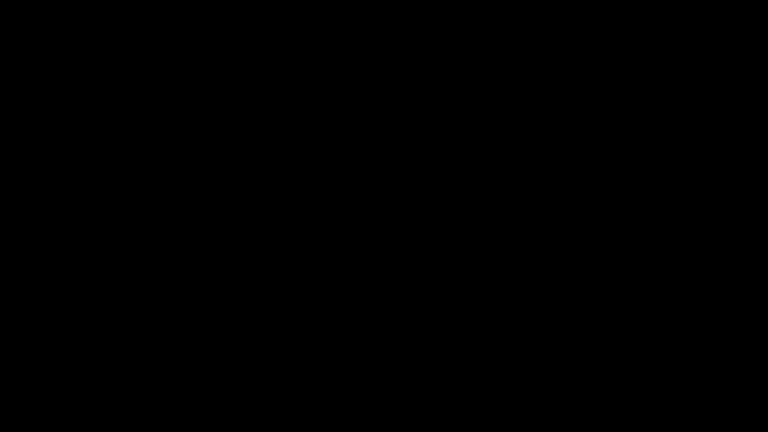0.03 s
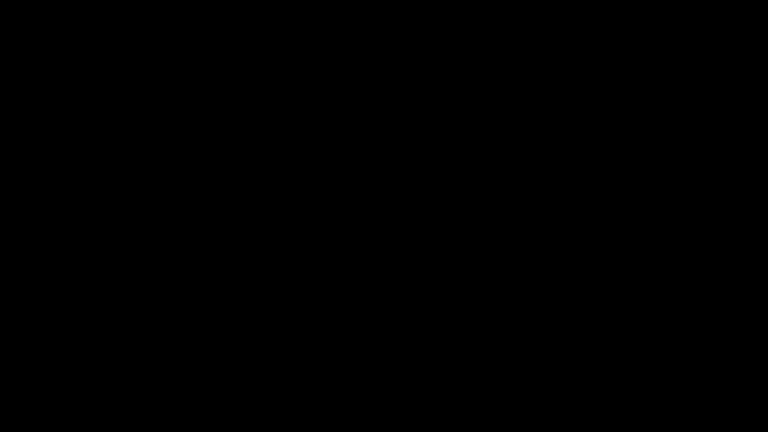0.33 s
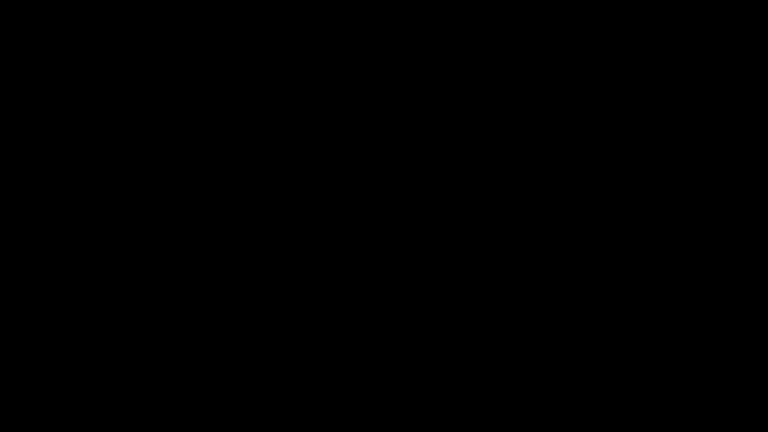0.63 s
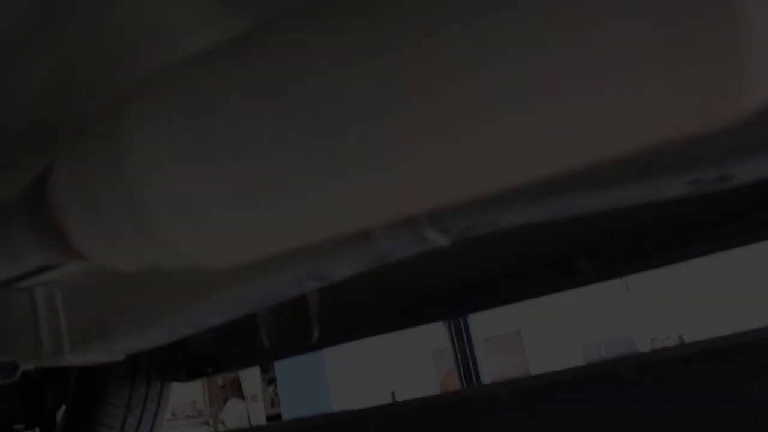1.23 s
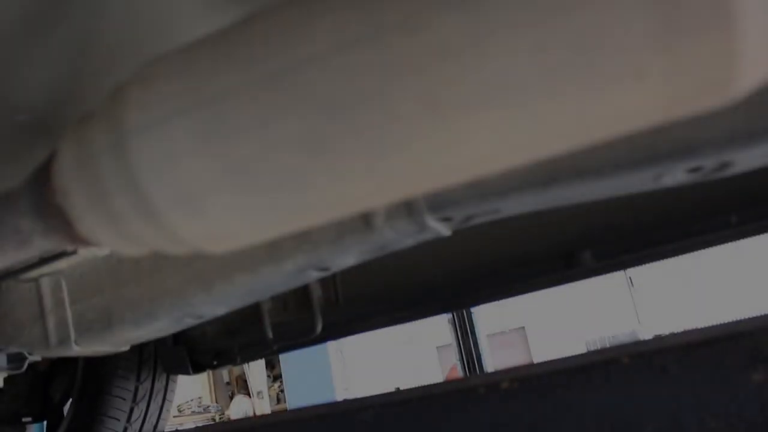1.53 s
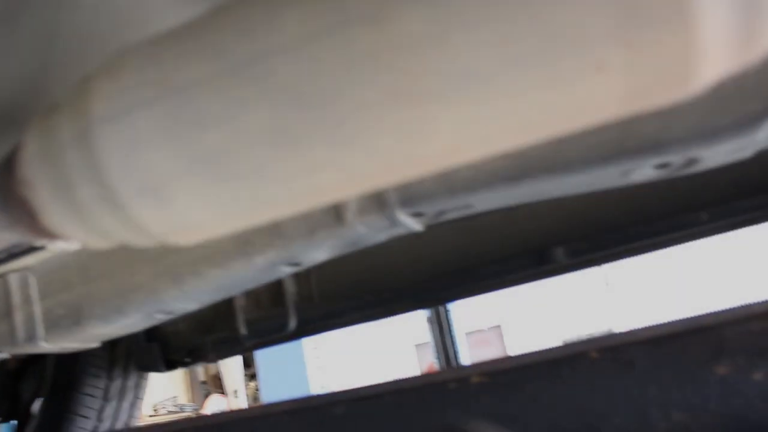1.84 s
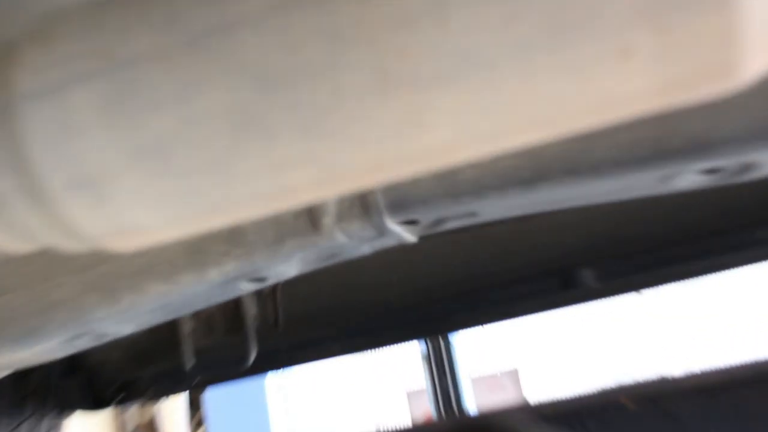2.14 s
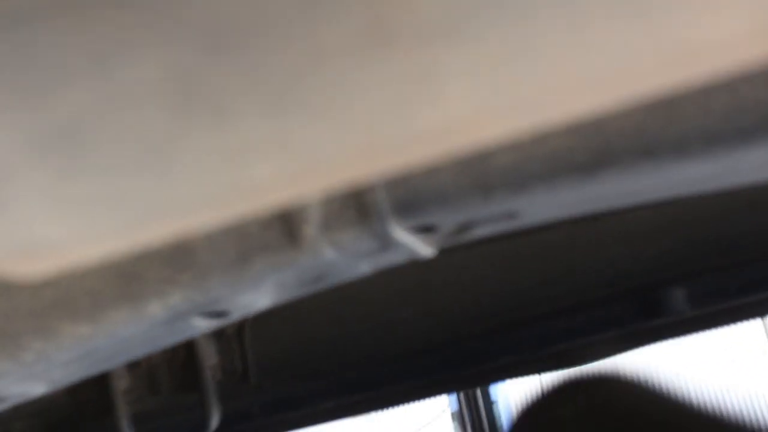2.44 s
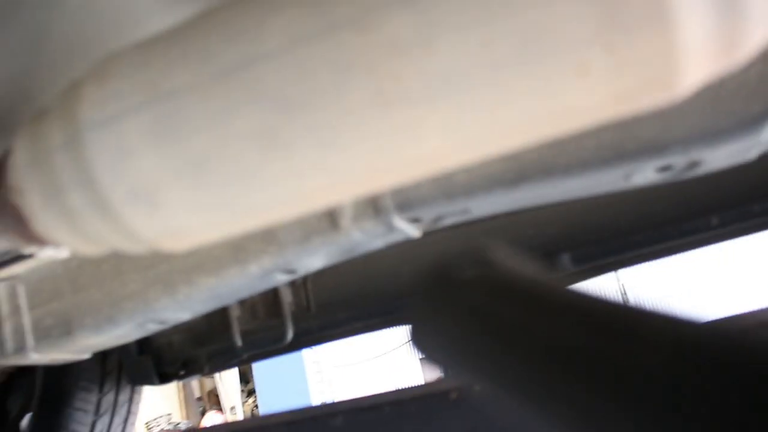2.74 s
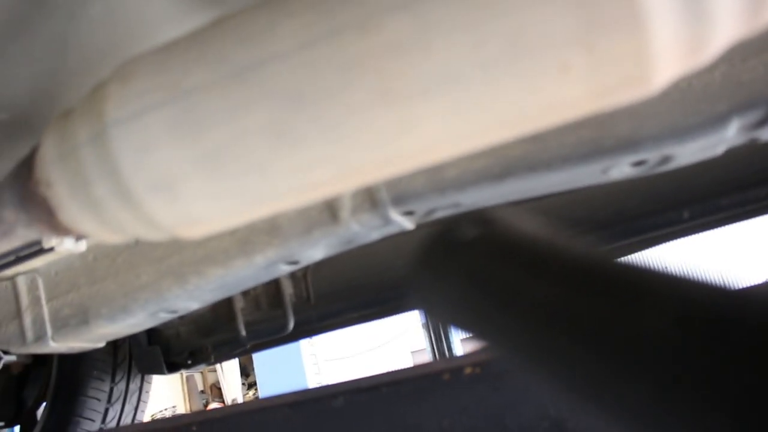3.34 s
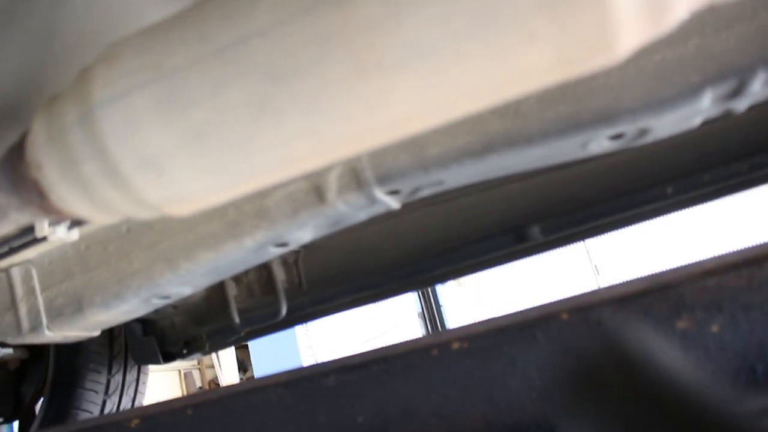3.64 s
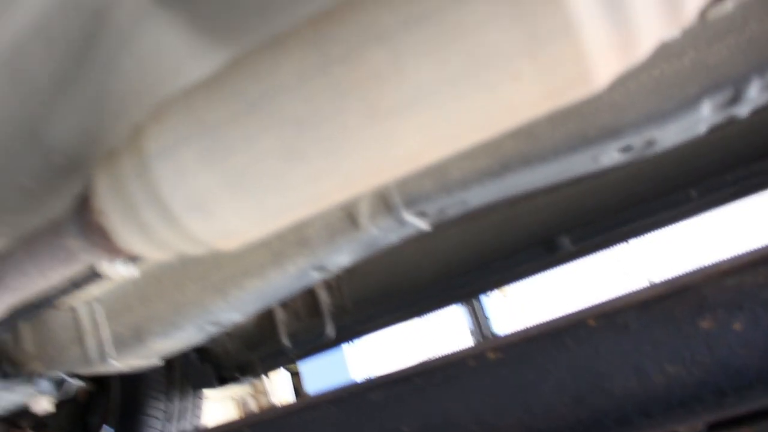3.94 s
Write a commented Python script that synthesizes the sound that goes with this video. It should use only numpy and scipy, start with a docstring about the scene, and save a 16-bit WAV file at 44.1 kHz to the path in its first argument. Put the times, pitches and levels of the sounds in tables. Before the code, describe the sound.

A fast metallic rattle from a loose exhaust part starts abruptly and continues for the whole four seconds, close up under a car. It clatters in about nine quick bursts a second with a high ring, easing briefly near 2 seconds and hitting hardest just before 3. Behind it the idling engine throbs and chugs with a light hiss, slightly louder at the start and between 2 and 2.5 seconds.

```python
"""Under an idling six-cylinder car, a stereo microphone close to the exhaust. Three times in every
engine cycle a loose metal part chatters against the pipe: a hard slam, a light rebound and a second
knock, all ringing near 2.8 kHz and reflecting between floor pan and ground. Behind it are the firing
pulses, the chug of the pipe, the throbbing hum of the engine and its belt drive, and a wash of
mechanical noise and hiss."""
import sys
import numpy as np
from scipy import signal
from scipy.fft import rfft, irfft
from scipy.io import wavfile
from scipy.ndimage import map_coordinates

SR = 44100
rng = np.random.default_rng(int(sys.argv[2]) if len(sys.argv) > 2 else 0)


def generate_wav(sig):
    """Save sig (samples, or channels by samples) to the path in sys.argv[1] as 16-bit PCM at SR."""
    pcm = np.round(np.clip(np.atleast_2d(sig).T, -1, 1) * 32767).astype(np.int16)
    wavfile.write(sys.argv[1], SR, pcm)


N = 176400
TIME_S = np.arange(N) / SR


def amp(db):
    """Decibels to gain."""
    return 10 ** (np.asarray(db) / 20)


def unit_rms(x):
    """Scales to rms 1."""
    return x / np.sqrt(np.mean(x ** 2) + 1e-20)


def at_time(points, s):
    """Reads a table along time."""
    return np.interp(s, *np.transpose(points))


def at_freq(points, hz):
    """Reads a table on a log-frequency axis."""
    freq_hz, value = np.transpose(points)
    return np.interp(np.log(hz + 1), np.log(freq_hz + 1), value)


def colour(x, spectrum):
    """Filters by a spectrum table."""
    gain = amp(at_freq(spectrum, np.fft.rfftfreq(len(x), 1 / SR)))
    return irfft(rfft(x) * gain, len(x))


def wander(n, rate_hz):
    """Smooth random drift of about unit size."""
    at = np.arange(n) * rate_hz / SR
    return map_coordinates(rng.standard_normal(256), [at], order=2, mode="wrap")


def add(mix, start_s, sound):
    """Mixes a sound in at a time."""
    part = mix[round(start_s * SR):][:len(sound)]
    part += sound[:len(part)]


def wavering_tone(phase_turns, waver):
    """A sine that drifts in phase and level."""
    phase = 2 * np.pi * (phase_turns + rng.random()) + waver * wander(N, 4.48)
    return np.sin(phase) * (1 + waver * wander(N, 6.44))


# Likeness of diffuse sound at the two sides of the microphone: freq_hz, likeness_ratio
LIKENESS = [(60, 0.55), (110, 0.94), (200, 0.98), (380, 0.85), (700, 0.87), (1290, 0.55), (2380, 0.51),
            (4400, 0.48), (8120, 0.13), (15000, 0.4)]
# Balance at the microphone: freq_hz, left_minus_right_db
BALANCE = [(60, -1), (150, -2), (380, -1.0), (950, -1.5), (2380, 0), (5980, 0.0), (15000, 1)]
def microphone(x, unrelated=None, left_lead_s=.000025):
    """Stereo pickup; a second, unrelated signal makes the sound diffuse."""
    hz = np.fft.rfftfreq(N, 1 / SR)
    left = right = rfft(x)
    if unrelated is not None:
        shared = np.sqrt(at_freq(LIKENESS, hz))
        right = shared * left + np.sqrt(1 - shared ** 2) * rfft(unrelated)
    side = amp(at_freq(BALANCE, hz) / 2) * np.exp(1j * np.pi * hz * left_lead_s)
    return irfft(np.array([left * side, right / side]), N)


def underbody(x, t60_s=0.12):
    """Short reflections between floor pan and ground, different on each side."""
    t = np.arange(SR // 5) / SR
    taps = rng.standard_normal((2, len(t))) * (rng.random((2, len(t))) < .1)
    taps *= amp(-60 * t / t60_s) * (t > .001)
    taps /= np.linalg.norm(taps, axis=1, keepdims=True)
    return signal.fftconvolve(x[None], taps, axes=1)[:, :N]


# Hiss of the engine bay, heard from under the car: freq_hz, density_db
HISS_SPECTRUM = [(800, -12), (2000, -3.5), (3500, 1), (5000, -3.5), (7000, -10), (10000, -19.5),
                 (13000, -25.5), (16000, -38)]
def bay_hiss(puffs):
    """Hiss that flickers and lifts with each firing."""
    air = rng.standard_normal(N) * (1 + 0.31 * puffs) * amp(wander(N, 60))
    return unit_rms(colour(air, HISS_SPECTRUM))


# Machinery all around the microphone: freq_hz, density_db
WASH_SPECTRUM = [(20, -38), (50, -33), (80, -13.5), (100, -6), (150, -6), (230, -4.5), (320, -7),
                 (430, -13), (540, -11.5), (640, -5), (850, -9), (1250, -8), (1550, -10.5), (1850, -10),
                 (2300, -18), (3000, -7.5), (5000, -69)]
def mechanical_wash():
    """The engine's moving parts blur into an even noise."""
    return unit_rms(colour(rng.standard_normal(N), WASH_SPECTRUM))


# The exhaust pipe from close by: freq_hz, density_db
CHUG_SPECTRUM = [(120, -47), (200, -4), (330, -11), (480, -27), (560, -11.5), (605, -0.5), (650, -3),
                 (720, -9), (900, -15), (2000, -46)]
def pipe_chug(cycles, cycle_s, delay_s=.087, swing_db=7):
    """Hollow pipe noise surges once a cycle."""
    surge = amp(swing_db * np.cos(2 * np.pi * (cycles - delay_s / cycle_s)))
    return unit_rms(colour(rng.standard_normal(N), CHUG_SPECTRUM) * surge)


# Each cylinder's pulse, in firing order: level_db
CYLINDER_LEVELS = [-2.5, -2, 0.5, 2.5, 0.5, 2]
def cylinder_puffs(cycles, cycle_s, delay_s=0.005, rise_s=0.001, decay_s=0.012):
    """Envelope of six uneven exhaust pulses a cycle."""
    cylinders = len(CYLINDER_LEVELS)
    fired, fraction = np.divmod((cycles - delay_s / cycle_s) * cylinders, 1)
    since_s = fraction * cycle_s / cylinders
    strength = amp(CYLINDER_LEVELS)[fired.astype(int) % cylinders]
    return strength * (1 - np.exp(-since_s / rise_s)) * np.exp(-since_s / decay_s)


# A firing pulse, heard beside the exhaust: freq_hz, density_db
FIRING_SPECTRUM = [(40, -35), (100, -3.5), (190, 0.5), (300, -1), (430, -6.5), (550, -3), (615, -0.5),
                   (700, 0), (820, -3.5), (1300, -5.5), (2200, -12), (5000, -22), (15000, -55)]
def firing_pulses(puffs, repeating_noise, repeat=0.67):
    """Puffs of gas whose noise partly repeats from cycle to cycle."""
    gas = repeat * repeating_noise + np.sqrt(1 - repeat ** 2) * rng.standard_normal(N)
    return unit_rms(colour(puffs * gas, FIRING_SPECTRUM))


# The belt drive, heard from under the car: pitch_hz, level_db, waver_ratio
BELT_TONES = [(166, -14.5, 0.38), (199.3, -10.5, 0.02), (330.2, -16, 0.28), (399.5, -20, 0.47),
              (457, -20, 0.3), (1039, -19, 0.43), (1826, -22, 0.6)]
def belt_drive(swell_db):
    """Belt tones swell with the engine noise; the strongest throbs against the boom."""
    return sum(amp(db + .9 * swell_db) * wavering_tone(hz * TIME_S, waver)
               for hz, db, waver in BELT_TONES)


# Swell of the exhaust's boom at the microphone: time_s, level_db
BOOM_SWELL = [(0.1, 3), (0.5, 2.5), (0.75, -1.5), (1.0, 0.5), (1.45, -6), (1.8, 0), (2.1, 2), (2.5, 4),
              (2.8, -6.5), (3.4, -9.5), (3.75, -6), (3.95, -8)]
# Engine orders: cycle_rate_multiple, level_db, swell_ratio
ENGINE_ORDERS = [(3, -38, 0), (4, -37, 0), (6, -20, 0.42), (12, -26.5, 0.36), (18, -18, 1.4),
                 (21, -10.5, 1.04), (28, -14, 1.8), (34, -18, 0.26), (67, -23.5, 0.81), (69.3, -17.5, 0.66)]
def engine_hum(cycles):
    """Tones at whole multiples of the cycle rate, each following the boom by its own amount."""
    boom_db = at_time(BOOM_SWELL, TIME_S)
    return sum(amp(db + follow * boom_db) * wavering_tone(round(order) * cycles, waver=.15)
               for order, db, follow in ENGINE_ORDERS)


# Engine noise at the microphone: time_s, level_db
ENGINE_SWELL = [(0.1, -23.5), (0.35, -22), (0.5, -23), (0.65, -25.5), (1.1, -25.5), (1.35, -28.5),
                (1.85, -27.5), (2.1, -24), (2.35, -24), (2.55, -25.0), (2.75, -27), (3.0, -28.5),
                (3.45, -29.5), (3.7, -27), (3.95, -27.5)]
def engine(starts_s):
    """The idle, running smoothly through the cycle starts: hum and belt in diffuse noise."""
    cycles = np.polyval(np.polyfit(starts_s, np.arange(len(starts_s)), deg=3), TIME_S)
    cycle_s = np.mean(np.diff(starts_s))
    level_db = at_time(ENGINE_SWELL, TIME_S)
    swell_db = level_db - level_db.mean()
    tones = np.sqrt(2) * amp(level_db.mean()) * (engine_hum(cycles) + belt_drive(swell_db))
    puffs = cylinder_puffs(cycles, cycle_s)
    one_cycle = rng.standard_normal(SR // 9)
    looped = one_cycle[(cycles % 1 * (len(one_cycle) - 1)).astype(int)]

    def noise(repeating_noise):
        """Firing, chug, wash and hiss, drawn afresh on each call."""
        low = amp(-7) * firing_pulses(puffs, repeating_noise)
        low += amp(-10.5) * pipe_chug(cycles, cycle_s) + amp(-4) * mechanical_wash()
        return amp(level_db) * low + amp(-30.5 + 0.85 * swell_db) * bay_hiss(puffs)

    return microphone(noise(looped) + tones, unrelated=noise(looped[::-1]))


BLOW_N, CHATTER_S = SR // 4, 0.015
BLOW_TIME_S = np.arange(BLOW_N) / SR
CONTACT_RISE = (1 - np.exp(-BLOW_TIME_S / 0.00056)) ** 2
RING_BUILD = 1 - np.exp(-(BLOW_TIME_S / 0.0045) ** 2)  # long rings build up during the chatter
def unit_blow(x):
    """Scales to the energy of one chatter at rms 1."""
    return x * np.sqrt(CHATTER_S * SR / (np.sum(x ** 2) + 1e-20))


def mode(hz, t60_s):
    """One dying vibration of the metal."""
    return amp(-60 * BLOW_TIME_S / t60_s) * np.sin(2 * np.pi * (hz * BLOW_TIME_S + rng.random()))


def chatter(contacts_per_s=900, spread_db=4.5):
    """Force on the part: a sharp first touch, then a burst of random contacts."""
    contacts = (rng.random(BLOW_N) < contacts_per_s / SR) * rng.standard_normal(BLOW_N)
    contacts *= amp(spread_db * rng.standard_normal(BLOW_N)) * np.exp(-(BLOW_TIME_S / CHATTER_S) ** 4)
    contacts[1] = 2.1  # first touch
    return contacts


# Metal clashing on the pipe, close up: freq_hz, density_db
CLASH_SPECTRUM = [(200, -8), (900, 8.5), (2000, -5), (3100, -3), (4400, -6), (6500, -5.5), (9000, -11.5),
                  (12000, -20), (16000, -34)]
def clash(contacts, scatter_s=0.0039, fade_s=0.0096):
    """Each contact scatters into a short, dry noise."""
    scatter = rng.standard_normal(BLOW_N) * np.exp(-BLOW_TIME_S / scatter_s)
    noise = colour(signal.fftconvolve(contacts, scatter)[:BLOW_N], CLASH_SPECTRUM)
    return unit_blow(noise * CONTACT_RISE * np.exp(-BLOW_TIME_S / fade_s))


# The first touch, close up: freq_hz, density_db
TICK_SPECTRUM = [(1000, -15), (4000, 0), (6500, -1), (9000, -4), (12000, -10), (16000, -28)]
def tick(fade_s=0.0014):
    """A bright snap as the part meets the pipe."""
    noise = colour(rng.standard_normal(BLOW_N), TICK_SPECTRUM)
    return unit_blow(noise * CONTACT_RISE * np.exp(-BLOW_TIME_S / fade_s))


# Main tone of the part, drifting slightly in pitch over time: time_s, pitch_hz
MAIN_PITCH = [(0.1, 2819), (1.1, 2843), (1.6, 2851), (2.5, 2820), (2.7, 2852), (3.9, 2843)]
def main_tone(start_s, level_db, linger_db, rise_s=.0034, fall_s=.0024, t60_s=0.18):
    """The part sounds roughly while it is shaken, then rings on."""
    t = BLOW_TIME_S
    hold_s = .0135 * rng.uniform(0.69, 1.45)
    swell = (1 - np.exp(-t / rise_s)) / (1 + np.exp(np.minimum((t - hold_s) / fall_s, 20)))
    hz = at_time(MAIN_PITCH, start_s) + 13.6 * rng.standard_normal() + 30 * swell * wander(BLOW_N, 254)
    shaken = amp(level_db - 0.5) * unit_blow(swell * (1 + .14 * wander(BLOW_N, 410)))
    lingering = amp(linger_db + 5) * unit_blow(RING_BUILD * amp(-60 * t / t60_s))
    phase = 2 * np.pi * (np.cumsum(hz) / SR + rng.random())
    return np.sqrt(2) * np.hypot(shaken, lingering) * np.sin(phase)


# Five families of modes of the loose part, close up: pitch_hz, level_db, t60_s
BODY_MODES = [(2620, -12.5, 0.085), (2720, -9.5, 0.041), (2802, -14.5, 0.025), (2908, -15, 0.073)]
CLANK_MODES = [(3684, -9, 0.045), (4220, -12, 0.053), (4442, -3.5, 0.045), (4714, -3, 0.058)]
TINKLE_MODES = [(6020, -3.5, 0.088), (6430, 0.5, 0.045), (6494, -9, 0.023), (7080, -11.5, 0.05),
                (7518, -13.5, 0.091), (7710, -10.5, 0.11), (8750, -9.5, 0.035), (10100, -11.5, 0.04),
                (11500, -20, 0.035)]
LINGER_MODES = [(2616, -5.5, 0.31), (2770, -5.5, 0.31), (2887, -12, 0.25)]
RING_MODES = [(3330, 3, 0.15), (3293, -6, 0.077), (3334, -9, 0.12)]
def blow(start_s, level_db, linger_db, ring_db, clank_db, tinkle_db, scatter_hz=5.15):
    """One blow on the pipe: contacts strike the short modes while the long rings build up."""
    contacts = chatter()
    out = np.zeros(BLOW_N)
    for modes, db in ((BODY_MODES, level_db), (CLANK_MODES, clank_db), (TINKLE_MODES, tinkle_db)):
        for hz, mode_db, t60_s in modes:
            struck = signal.fftconvolve(contacts, CONTACT_RISE * mode(hz, t60_s))[:BLOW_N]
            out += amp(db + mode_db) * unit_blow(struck)
    for modes, db in ((LINGER_MODES, linger_db), (RING_MODES, ring_db)):
        for hz, mode_db, t60_s in modes:
            ringing = RING_BUILD * mode(hz + scatter_hz * rng.standard_normal(), t60_s)
            out += amp(db + mode_db) * unit_blow(ringing)
    out += amp((clank_db + tinkle_db) / 2 + 1) * clash(contacts)
    out += amp(tinkle_db - 5) * tick()
    return out + main_tone(start_s, level_db, linger_db)


# The loose part right by the microphone, one row per engine cycle:
# start_s, slam_db, rebound_db, knock_db, linger_db, ring_db, clank_db, tinkle_db
RATTLE_CYCLES = [(0.068, -18.5, -22.5, -21, -29, -27, -25.5, -36),
                 (0.177, -20.5, -36, -31, -26, -36.5, -34, -41),
                 (0.287, -17.5, -33, -22.5, -45, -39, -30.0, -41),
                 (0.4, -18, -22.5, -21, -31, -33, -28, -39.5), (0.515, -15, -22, -19, -29, -25.5, -25, -35),
                 (0.628, -14.5, -19.5, -17, -22.5, -28.5, -27.5, -35.5),
                 (0.739, -15, -28, -20.5, -21.5, -27, -27.5, -38),
                 (0.8522, -16.5, -31, -19.5, -20, -27.5, -30.0, -38),
                 (0.965, -16.5, -22.5, -19, -38, -25, -27.5, -35),
                 (1.077, -16.5, -24, -16.5, -28.5, -27.5, -28.5, -37),
                 (1.191, -14.5, -49, -18, -22.5, -28, -29.5, -36.5),
                 (1.304, -17, -22.5, -18.5, -21, -23, -27, -36), (1.417, -20, -27, -23, -23, -23, -26, -37),
                 (1.53, -15.5, -27, -19, -27.5, -26.5, -25.5, -37.5),
                 (1.642, -19, -29, -21.0, -28, -25.5, -29, -38),
                 (1.755, -18, -24.5, -24.5, -37, -23.5, -31, -37),
                 (1.867, -20, -27, -21.5, -41, -31.5, -34.5, -48),
                 (1.979, -24, -37, -24.5, -32, -34, -34, -46.0),
                 (2.089, -16.5, -29.0, -25, -30, -33, -37, -42),
                 (2.202, -17, -24.5, -20.5, -32, -27, -29, -38.5),
                 (2.314, -17, -25, -20.0, -28, -27, -26.5, -37),
                 (2.428, -16, -28, -19, -27, -30, -29.5, -38.5),
                 (2.542, -16.5, -23, -17.5, -35, -34, -28, -34.5),
                 (2.656, -13, -33, -15, -23.5, -32, -29.5, -35),
                 (2.769, -17.5, -22, -19.5, -23.5, -32, -29.5, -36.5),
                 (2.883, -11, -17, -16.5, -24, -32, -30.5, -33.5),
                 (2.997, -16, -26, -22.5, -19, -26.5, -27, -36.5),
                 (3.111, -18.5, -23, -26.5, -17, -28, -31.5, -33.5),
                 (3.225, -17.5, -18, -20.5, -23, -27.5, -28.5, -32.5),
                 (3.339, -14.5, -17.5, -18.5, -22, -26, -34.5, -33.5),
                 (3.451, -17, -26.5, -27.5, -30, -39.5, -36, -35.5),
                 (3.562, -20.0, -32, -21, -33, -37, -34, -39),
                 (3.677, -19.5, -24.5, -22, -25.5, -25, -31.5, -36),
                 (3.791, -15.5, -23, -16.5, -21, -29, -29, -36),
                 (3.903, -22.5, -27, -27.5, -29.5, -29, -33, -40)]
def rattle(rebound_s=.0345, knock_s=.0725):
    """Slam, rebound and second knock in each cycle; the lighter blows are duller and ring less."""
    out = np.zeros(N)
    for start_s, slam_db, rebound_db, knock_db, linger_db, ring_db, clank_db, tinkle_db in RATTLE_CYCLES:
        add(out, start_s, blow(start_s, slam_db, linger_db, ring_db, clank_db, tinkle_db))
        for delay_s, db in ((rebound_s, rebound_db), (knock_s, knock_db)):
            softer_db = min(db - slam_db, 0)
            damp_db, dull_db = softer_db - 1, 1.16 * softer_db - 3.5
            lighter = blow(start_s, db, linger_db + damp_db, ring_db + damp_db,
                           clank_db + dull_db, tinkle_db + dull_db)
            add(out, start_s + delay_s, lighter)
    return out


def scene():
    """Reflections under the car, the engine and the rattle close by."""
    metal = rattle()
    starts_s = [row[0] for row in RATTLE_CYCLES]
    return amp(-14) * underbody(metal) + engine(starts_s) + microphone(metal)


def record(dry, start_s=.068, cutoff_hz=15700):
    """The sound cuts in abruptly, and a steep low-pass takes off the highest treble."""
    gate = np.clip((TIME_S - start_s) * 1000, 0, 1)
    lowpass = signal.firwin(511, cutoff_hz, window=("kaiser", 9), fs=SR)
    return signal.oaconvolve(dry * gate, lowpass[None], "same")


dry = scene()
out = record(dry)
generate_wav(out)
```